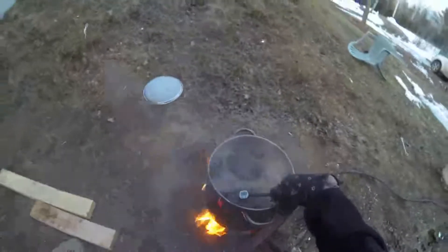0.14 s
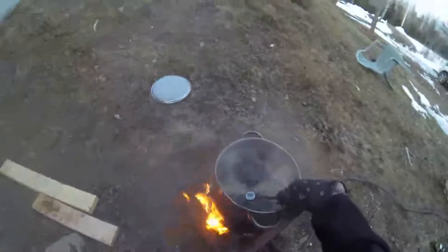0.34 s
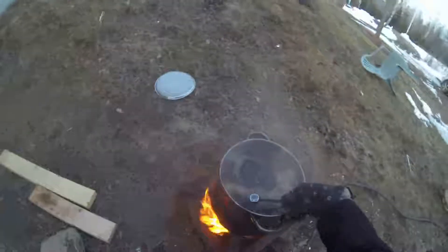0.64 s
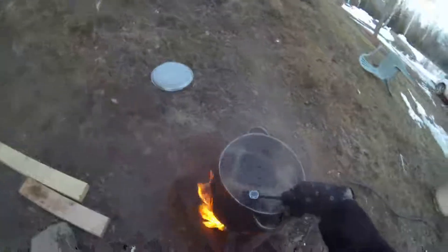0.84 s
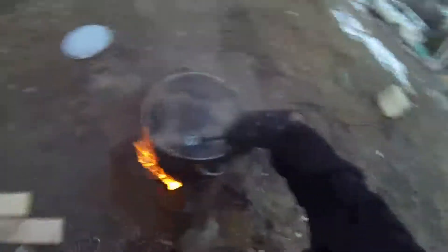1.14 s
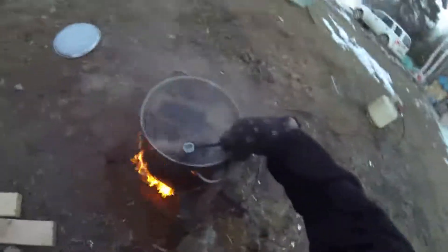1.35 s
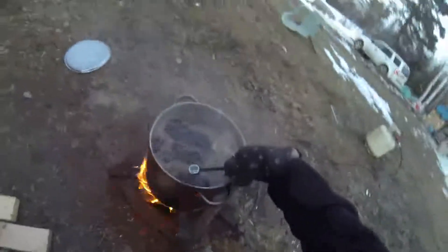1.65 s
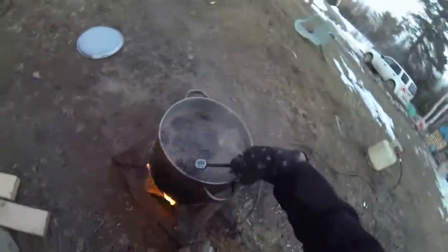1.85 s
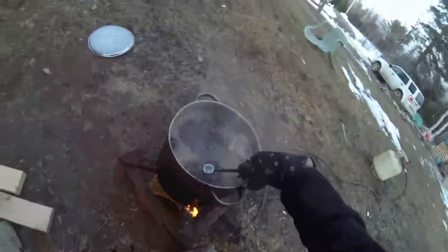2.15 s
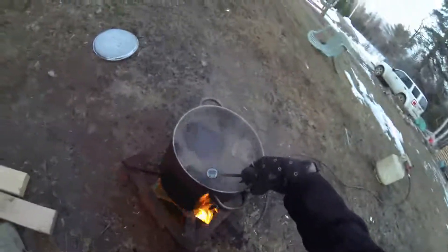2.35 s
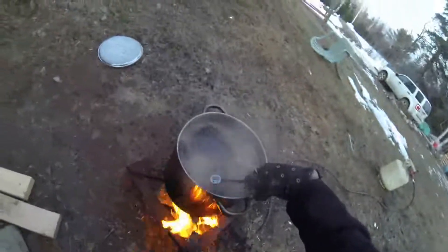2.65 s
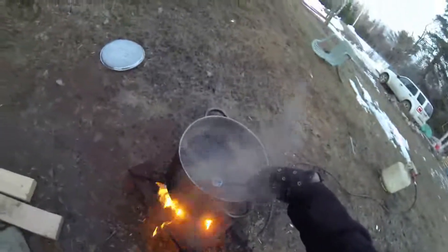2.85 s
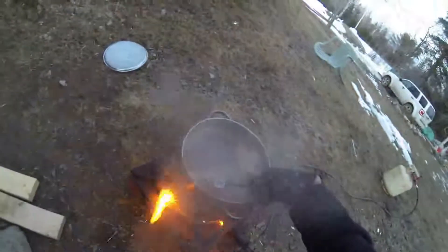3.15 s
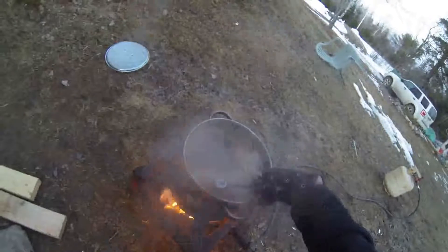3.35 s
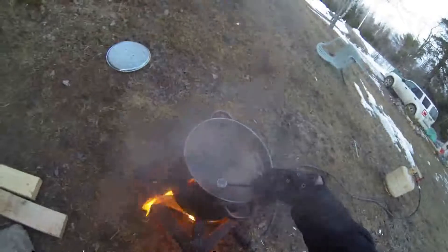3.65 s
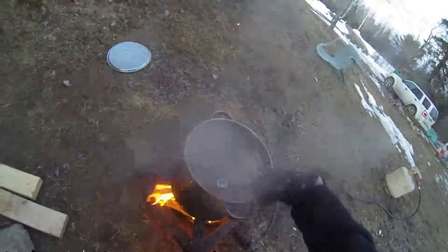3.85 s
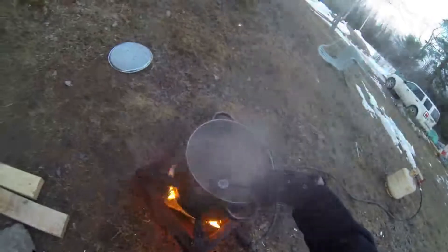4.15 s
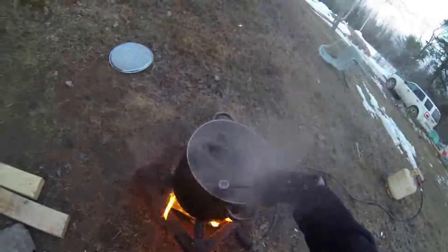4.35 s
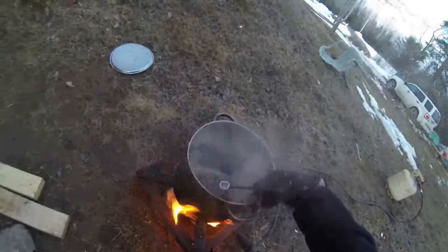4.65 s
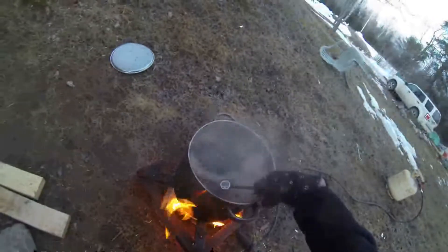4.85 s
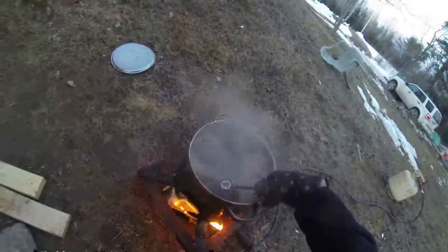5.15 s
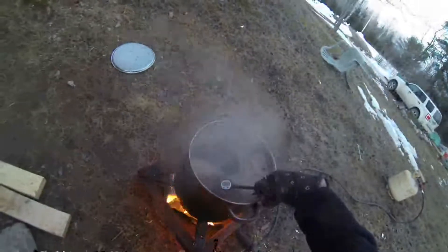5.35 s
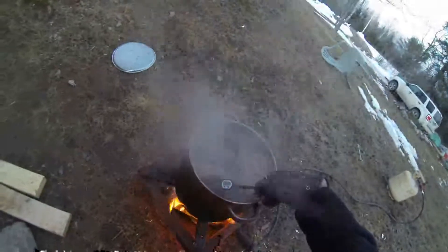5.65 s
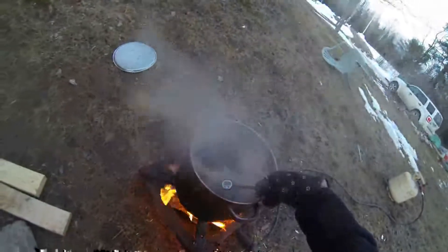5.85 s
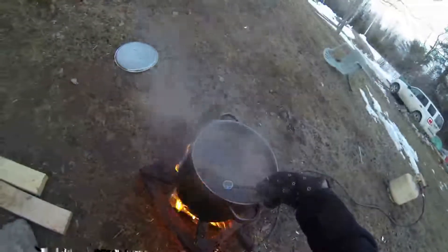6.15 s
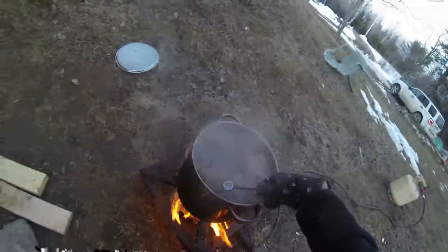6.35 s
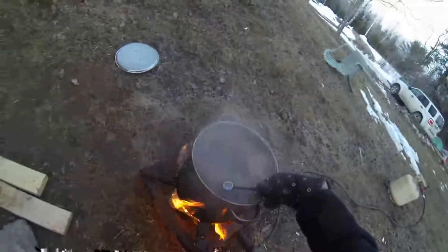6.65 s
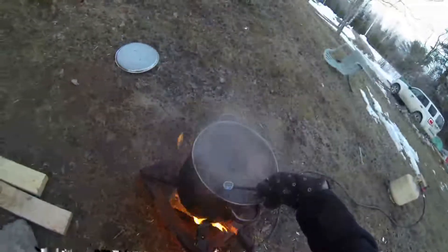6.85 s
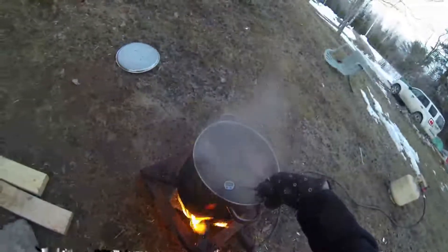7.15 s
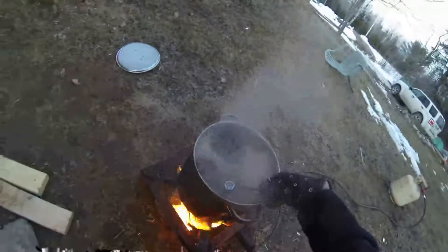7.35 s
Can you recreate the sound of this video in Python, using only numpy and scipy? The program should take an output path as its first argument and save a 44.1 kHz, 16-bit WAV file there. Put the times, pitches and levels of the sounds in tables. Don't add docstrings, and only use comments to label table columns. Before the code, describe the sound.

A pot of thick liquid boils hard outdoors, close to a small enclosed microphone, dry and slightly muffled. Throughout, countless bubbles merge into a grainy mid-pitched seethe with soft froth and fine fizz, dotted with hollow plops and droplets. From 0.4 to 1.6 s short wet bursts spatter, densest near 1.2 s. Wind thumps at about 1.7 s; a bright, loud plop stands out at 2.2 s. From 2.6 to 3.3 s deep gusts buffet and softly overload the microphone, partly covering the boil. They ease by 3.5 s. Splashes return around 4.1 to 5.3 s while the seethe sits slightly lower; 5.4 to 6.1 s is sparser. At 6.4 s a heavy gulping burst slaps, then spatters crowd in up to 7.5 s. Beneath, flames drone low and wavering, damp wood hisses faintly, and tiny sap ticks are rare, the clearest near 7.3 s.

```python
import sys
import numpy as np
from scipy import signal
from scipy.fft import rfft, irfft, next_fast_len
from scipy.io import wavfile
from scipy.ndimage import uniform_filter1d

SR = 44100
rng = np.random.default_rng(int(sys.argv[2]) if len(sys.argv) > 2 else 0)


def int16_out(signal):
    q = np.round(np.clip(np.atleast_2d(signal).T, -1, 1) * 32767)
    wavfile.write(sys.argv[1], SR, q.astype(np.int16))


def volts_from_decibels(level):
    exponent = np.asarray(level, float) / 20
    return 10 ** exponent


N = 330309

# start in seconds, then levels in dB of seething, froth,
# damp-wood hiss and thin steam jet.
BOIL = [(0.0, -53, -61, -80, -85), (0.1, -54.5, -61.5, -81, -87), (0.42, -56, -63, -79, -85),
        (0.79, -55, -62, -76, -89), (1.0, -54, -61.5, -76, -83), (1.11, -53, -60.5, -72, -90),
        (1.19, -52.5, -61, -75, -86), (1.38, -52, -60.5, -75, -89), (1.63, -52, -60, -77.5, -89),
        (2.0, -54, -62, -76.5, -86), (2.52, -53.5, -60, -79, -90), (2.61, -54, -62, -77, -92),
        (2.88, -52, -61.5, -80, -87), (3.17, -53.5, -62.5, -82, -95), (3.19, -53, -64.5, -80, -89),
        (3.44, -53, -62.5, -78, -90), (3.52, -50, -62.5, -84, -81), (3.63, -54, -61, -79, -88),
        (3.92, -57, -65, -82, -91), (4.23, -55.5, -63, -84, -91), (4.34, -56, -66.5, -78, -86),
        (4.57, -54, -65, -84, -92), (4.8, -55.5, -63.5, -81, -88), (4.84, -55, -63, -77, -92),
        (5.21, -57.5, -65.5, -80, -90), (5.42, -57.5, -65, -78, -88), (5.57, -56, -66.5, -82, -91),
        (6.13, -56, -65, -81, -93), (7.15, -56, -64.5, -79, -90), (7.43, -55, -60, -73, -87),
        (7.49, -52, -60, -82, -90)]
# frequency in Hz, density in dB per Hz.
SEETHE_SPECTRUM = [(76, -19), (130, -3.5), (309, -4), (422, -9), (615, -4), (800, -4.5), (930, -1),
                   (1240, -11.5), (1920, -5.5), (2150, -31), (2600, -30), (3380, -56), (5720, -120)]
# frequency in Hz, density in dB per Hz.
FROTH_SPECTRUM = [(1180, -28), (2000, -2.5), (2130, 0.5), (2400, -2), (2720, -2.5), (2970, 1), (3670, -8),
                  (4490, -9.5), (5180, -6), (5800, -20.5), (6500, -22), (8450, -47), (14300, -120)]
# frequency in Hz, density in dB per Hz.
FIZZ_SPECTRUM = [(2940, -3), (5000, -6), (5280, -2), (5930, -4), (7230, -4), (8450, -4), (9490, -10),
                 (10500, -6), (11700, -11.5), (13200, -18.5), (14200, -7), (15000, -12)]


def evened(x):
    return x / np.sqrt(np.mean(x ** 2) + 1e-20)


def column(rows, index):
    table = np.array(rows)
    return np.interp(np.arange(N) / SR, table[:, 0], table[:, index])


def coloured(x, spectrum):
    size = next_fast_len(len(x))
    f, db = np.transpose(spectrum)
    hz = np.fft.rfftfreq(size, 1 / SR)
    gain = volts_from_decibels(np.interp(np.log(hz + 1), np.log(f + 1), db))
    return evened(irfft(rfft(x, size) * gain, size)[:len(x)])


def resonate(x, hz, width_hz):
    turn = np.exp(2j * np.pi * hz * np.arange(len(x)) / SR)
    r = np.exp(-np.pi * width_hz / SR)
    return 2 * (turn * signal.lfilter([1 - r], [1, -r], x / turn)).real


def steadied(x, window_s):
    power = uniform_filter1d(x ** 2, max(round(window_s * SR), 1)).clip(1e-9)
    return evened(x / np.sqrt(power + 0.036))


def patchy(patchy_db, patch_hz, patch_s):
    frames = N // 64 + 5
    a, b, patches = rng.standard_normal((frames, 129, 3)).T
    patches = uniform_filter1d(patches, max(round(patch_hz * 256 / SR), 1), 0)
    patches = evened(uniform_filter1d(patches, max(round(patch_s * SR / 64), 1), 1))
    bins = (a + 1j * b) * volts_from_decibels(patchy_db * patches)
    return signal.istft(bins, nperseg=256, noverlap=192)[1][:N]


def add(mix, s, sound):
    part = mix[round(s * SR):][:len(sound)]
    part += sound[:len(part)]


def ticks(per_s, spread_db):
    size = volts_from_decibels(spread_db * np.minimum(rng.exponential(1, N), 3)) * rng.choice([-1, 1], N)
    return evened(size * (rng.random(N) < per_s / SR))


def seething():
    t = np.arange(4000) / SR
    spit = volts_from_decibels(-60 * t / 0.07) * (1 - np.exp(-t / 0.001))
    kick = signal.oaconvolve(abs(ticks(60, 3.0)), spit)[:N]
    grain = evened(patchy(1.5, 500, 0.012)) + 0.9 * ticks(450, 3.5)
    body = evened(coloured(grain, SEETHE_SPECTRUM) * (1 + 0.025 * kick))
    froth = evened(coloured(patchy(1.3, 900, 0.022), FROTH_SPECTRUM) * (1 + 0.011 * kick))
    fizz = evened(coloured(patchy(1.2, 2500, 0.021), FIZZ_SPECTRUM) * (1 + 0.0067 * kick))
    return body * volts_from_decibels(column(BOIL, 1) - 2.0) + froth * volts_from_decibels(column(BOIL, 2)) + fizz * volts_from_decibels(-72.5)


def plop(hz, cycles, glide, rise=0.78):
    turns = np.arange(round(4 * cycles * SR / hz)) * hz / SR
    shape = (1 - np.exp(-(turns / rise) ** 2)) * np.exp(-2.2 * turns / cycles)
    return -np.sin(2 * np.pi * turns * (1 + glide * turns)) * shape / shape.max()


def swarm(per_s, low_hz, high_hz, loudest_hz, cycles, slope_db):
    out, kinds = np.zeros(N), np.geomspace(low_hz, high_hz, 16)
    size = volts_from_decibels(4.9 * np.minimum(rng.exponential(1, N), 3)) * (rng.random(N) < per_s / SR)
    kind = rng.integers(0, len(kinds), N)
    for k, hz in enumerate(kinds):
        octaves_off = abs(np.log2(hz / loudest_hz))
        ring = plop(hz, cycles, 0.0101) * volts_from_decibels(-slope_db * octaves_off)
        out += signal.oaconvolve(size * (kind == k), ring)[:N]
    return evened(out) * volts_from_decibels(column(BOIL, 1) + 53.5)


def bubbles():
    # start in seconds, peak in dB, pitch in Hz, cycles until faded.
    plops = [(0.089, -42, 950, 2.7), (0.194, -29.5, 860, 1.5), (0.255, -38, 985, 3.0),
             (0.451, -38, 1610, 3.0), (0.509, -45, 972, 3.0), (0.946, -41, 826, 3.3),
             (1.143, -35, 1000, 3.0), (1.375, -38.5, 930, 4.1), (1.956, -40.5, 910, 4.1),
             (2.036, -36.5, 704, 3.8), (2.196, -29.5, 610, 3.0), (2.219, -19, 1030, 3.8),
             (2.269, -36, 867, 2.7), (2.283, -37.5, 460, 3.3), (2.385, -34, 925, 3.0),
             (2.459, -36.5, 570, 2.2), (2.622, -44, 395, 3.0), (2.719, -49, 600, 3.0),
             (2.805, -36, 865, 3.0), (3.12, -35.5, 610, 4.7), (3.478, -41, 1750, 3.0),
             (3.499, -51, 795, 3.0), (3.546, -35.5, 960, 2.6), (3.689, -42, 781, 4),
             (3.71, -33.5, 888, 3.8), (3.822, -44, 620, 2.5), (3.864, -37, 1070, 3.0),
             (3.892, -35.5, 980, 4.2), (4.248, -41, 503, 2.4), (4.756, -43, 966, 3.0),
             (5.426, -35.5, 904, 7.6), (5.565, -39.5, 925, 3.0), (5.594, -40, 1000, 3.6),
             (5.907, -39.5, 1040, 3.3), (6.149, -41, 990, 3.5), (6.194, -35.5, 970, 3.6),
             (6.94, -31.5, 600, 1.4), (7.189, -38.5, 550, 4.1)]
    # start in seconds, peak in dB, pitch in Hz,
    # cycles until faded.
    gulps = [(0.661, -44, 280, 4.3), (1.204, -54, 280, 1.6), (1.41, -37.5, 196, 1.9),
             (2.345, -42, 290, 1.8), (2.418, -44, 121, 1.8), (2.614, -30.5, 119, 1.6),
             (2.766, -35.5, 161, 2.8), (2.925, -49, 213, 1.6), (3.319, -39, 149, 1.4),
             (4.36, -45, 272, 0.98), (4.41, -34, 262, 0.77), (4.642, -44.5, 161, 1.9),
             (4.851, -39, 300, 3.9), (5.073, -41, 342, 1.6), (5.275, -38.5, 224, 3.3),
             (6.367, -26, 223, 1.5), (6.486, -39, 300, 2.2), (7.009, -44, 196, 1.9), (7.406, -38, 323, 1.6),
             (7.44, -33.5, 230, 1.8)]
    # start in seconds, peak in dB, pitch in Hz, cycles until faded.
    cracks = [
        (0.6529, -62, 6650, 9.0),
        (2.9557, -61, 7740, 9.0),
        (3.6566, -61, 8300, 9.0),
        (5.7468, -59, 8370, 9.0),
        (6.3694, -59, 6640, 9.9),
        (7.2863, -53, 8500, 9.0),
    ]
    out = volts_from_decibels(-61) * swarm(260, 261.3, 2094, 870, 4.7, 2.0)
    out += volts_from_decibels(-67.5) * swarm(280, 1486, 9400, 1540, 12.0, 5.2)
    for s, db, hz, cycles in plops:
        add(out, s + 0.00058, volts_from_decibels(db - 2.5) * plop(hz, max(cycles, 0.7), 0.004))
        add(out, s + 0.00051, volts_from_decibels(db - 13.5) * plop(1.49 * hz, 4.7, 0.013))
    for s, db, hz, cycles in gulps:
        add(out, s + 0.00052, volts_from_decibels(db - 3.5) * plop(hz, max(cycles, 0.7), 0.004, rise=0.8))
    for s, db, hz, cycles in cracks:
        add(out, s, volts_from_decibels(db + 2.5) * plop(hz, cycles, 0.001))
    return out


def splashes():
    # start in seconds, gush level in dB, slap level in dB, spray level in dB, t60 in seconds.
    bursts = [(0.39, -41.5, -64, -57, 0.15), (0.459, -49, -62, -70, 0.045), (0.667, -53, -65, -56, 0.1),
              (0.834, -49, -65, -52.5, 0.094), (1.018, -39.5, -60, -54, 0.098),
              (1.058, -43, -50, -54, 0.16), (1.208, -34, -53, -56, 0.12), (1.257, -37, -44, -54, 0.11),
              (1.413, -42.5, -54, -61, 0.18), (1.445, -53, -53, -62, 0.14), (1.564, -40.5, -52, -63, 0.099),
              (2.054, -38, -61, -62, 0.092), (2.116, -38, -60, -69, 0.044), (2.172, -51, -48, -63, 0.1),
              (2.421, -46, -42.5, -56, 0.17), (2.503, -34.5, -48, -50, 0.075),
              (2.544, -39, -58, -53, 0.057), (2.726, -39, -51, -76, 0.14), (2.783, -47, -58, -56, 0.13),
              (2.917, -43.5, -49, -53, 0.2), (3.637, -47, -54, -63, 0.12), (3.796, -47.5, -60, -59.5, 0.29),
              (3.97, -50, -67, -69, 0.054), (4.056, -37, -65, -61, 0.15), (4.165, -32.5, -64, -53, 0.082),
              (4.191, -54, -65, -50, 0.069), (4.277, -38.5, -52, -55, 0.13), (4.315, -43, -50, -59, 0.11),
              (4.361, -64, -46, -59.5, 0.32), (4.491, -48, -65, -60, 0.091), (4.524, -41.5, -70, -56, 0.19),
              (4.634, -48, -49, -57, 0.26), (4.685, -40, -64, -60, 0.067), (4.832, -33, -48, -50, 0.072),
              (5.034, -47, -64, -69, 0.16), (5.076, -38, -42.5, -54.5, 0.19), (5.28, -37.5, -52, -57, 0.11),
              (5.737, -45.5, -48, -64, 0.23), (6.162, -39.5, -67, -60, 0.11),
              (6.369, -35.5, -35.5, -53.5, 0.15), (6.418, -43, -45, -53.5, 0.077),
              (6.458, -45.5, -61, -65, 0.11), (6.49, -40.5, -44.5, -53, 0.19),
              (6.541, -33.5, -62, -62, 0.07), (6.745, -40, -75, -61.5, 0.15),
              (6.828, -43.5, -45, -54.5, 0.13), (6.953, -46, -46, -57, 0.099),
              (7.014, -43.5, -45.5, -52, 0.15), (7.164, -47, -44.5, -56.5, 0.18),
              (7.298, -37.5, -44, -50, 0.08), (7.356, -35, -51, -49.5, 0.069),
              (7.41, -34, -36, -51.5, 0.13)]
    slap_spectrum = [(90, -28), (170, -8), (300, 8.5), (450, -8.5), (900, -42), (3000, -120)]
    t = np.arange(9000) / SR
    gush_env, slap_env, spray_env = np.zeros((3, N))
    for s, gush_db, slap_db, spray_db, t60_s in bursts:
        fade = (1 - np.exp(-t / 0.00099)) * volts_from_decibels(-60 * t / max(t60_s, 0.02))
        add(gush_env, s, volts_from_decibels(gush_db - 6.5) * fade)
        add(slap_env, s, volts_from_decibels(slap_db - 3.0) * fade)
        add(spray_env, s, volts_from_decibels(spray_db + 0.5) * fade)
    grain = evened(patchy(1.1, 500, 0.006)) + 1.56 * ticks(700, 2.3)
    gush = steadied(coloured(grain, SEETHE_SPECTRUM), 0.0067)
    slap = steadied(coloured(rng.standard_normal(N), slap_spectrum), 0.0043)
    spray = coloured(patchy(2.2, 900, 0.005), FROTH_SPECTRUM)
    spray = spray + 0.12 * coloured(rng.standard_normal(N), FIZZ_SPECTRUM)
    return gush_env * gush + slap_env * slap + spray_env * spray


def fire():
    # time in seconds, level in dB.
    flame = [
        (0, -64),
        (1.2, -58.5),
        (2.5, -63),
        (4.5, -57),
        (4.9, -67),
        (6.4, -68),
        (6.8, -59),
        (7.49, -54.5),
    ]
    drone_hz, waver_hz, waver_db = 91, 1.8, 2.35
    waver = uniform_filter1d(rng.standard_normal((2, N)), 2500)
    waver = evened(uniform_filter1d(waver, 2500))
    phase = 2 * np.pi * np.cumsum(drone_hz + waver_hz * waver[0]) / SR
    drone = evened(np.sin(phase) * volts_from_decibels(waver_db * waver[1])) * volts_from_decibels(column(flame, 1))
    hiss = patchy(1.5, 900, 0.01)
    wood = evened(resonate(resonate(hiss, 8500, 900), 8500, 900)) * volts_from_decibels(column(BOIL, 3) - 2.0)
    jet = evened(resonate(resonate(hiss, 13000, 1000), 13000, 1000)) * volts_from_decibels(column(BOIL, 4) + 5.5)
    return drone + wood + jet


def wind():
    # start in seconds, rumble level in dB, buffeting level in dB.
    gusts = [(0.0, -59, -56), (0.06, -47, -67), (0.23, -46.5, -65), (0.35, -58, -63), (0.42, -48.5, -71),
             (0.48, -64, -73), (0.5, -47, -64), (0.69, -56.5, -63), (0.77, -48, -61), (0.87, -59, -70),
             (0.94, -48.5, -76), (1.13, -44, -71), (1.23, -50.5, -60.5), (1.61, -49, -53),
             (1.69, -37.5, -66), (1.75, -31, -61), (1.81, -30.5, -59), (1.85, -42.5, -58),
             (1.92, -47.5, -58), (1.98, -40, -59), (2.21, -52, -66), (2.23, -38, -66), (2.25, -39, -63),
             (2.31, -47, -58), (2.33, -42, -57), (2.52, -42.5, -54), (2.61, -26.5, -57.5), (2.65, -20, -61),
             (2.71, -37, -56), (2.77, -24.5, -58), (2.9, -37, -73), (2.94, -26.5, -56), (3.02, -47, -62),
             (3.06, -25, -65), (3.13, -33, -62), (3.17, -28.5, -58), (3.23, -38, -59), (3.32, -32, -56),
             (3.4, -44.5, -58), (3.44, -43, -62), (3.5, -51, -63), (3.67, -44.5, -62), (3.73, -62, -60),
             (3.8, -44, -59), (3.84, -57, -60), (3.88, -43.5, -64), (4.01, -56, -58.5), (4.23, -41.5, -69),
             (4.42, -51, -57), (4.49, -60, -68), (4.53, -48.5, -68), (4.63, -55, -64), (4.8, -53.5, -67),
             (4.88, -45.5, -58), (4.94, -53.5, -61), (5.19, -49, -54.5), (5.21, -64, -62),
             (5.25, -47.5, -57.5), (5.42, -58, -59), (5.51, -44, -59.5), (5.57, -63, -63), (5.61, -48, -56),
             (5.65, -55, -62), (5.8, -36, -56), (5.88, -39.5, -65), (5.94, -50.5, -64), (6.01, -43, -59),
             (6.09, -61, -63), (6.15, -48, -61), (6.22, -50, -63), (6.3, -35.5, -63), (6.47, -53.5, -55),
             (6.51, -39.5, -59), (6.55, -64, -52), (6.61, -42, -64), (6.65, -59, -63), (6.7, -40, -61),
             (6.82, -56, -67), (6.86, -42, -59), (6.92, -54, -67), (7.15, -49.5, -76), (7.28, -52, -66),
             (7.32, -36, -48), (7.34, -38, -56), (7.41, -50, -62), (7.49, -51, -64)]
    # frequency in Hz, density in dB per Hz.
    rumble_spectrum = [(5, -31), (10, -8), (21, -4), (32, -1), (45, -5.5), (70, -17.5), (110, -29),
                       (140, -57), (240, -120)]
    # frequency in Hz, density in dB per Hz.
    buffet_spectrum = [(45, -53), (90, -3), (135, 0), (200, -7), (320, -11), (600, -53), (2000, -120)]
    # start in seconds, peak in dB, pitch in Hz.
    puff = (1.7555, -25, 115)
    rumble_db = column(gusts, 1)
    rumble = steadied(coloured(rng.standard_normal(N), rumble_spectrum), 0.09) * volts_from_decibels(rumble_db)
    buffet_db = column(gusts, 2) + np.maximum(rumble_db + 36, 0)
    buffet = steadied(coloured(rng.standard_normal(N), buffet_spectrum), 0.036) * volts_from_decibels(buffet_db)
    puff_s, puff_db, puff_hz = puff
    add(buffet, puff_s, -volts_from_decibels(puff_db) * plop(puff_hz, 1.0, -0.086, rise=0.26))
    return rumble + buffet


def scene():
    return (seething() + bubbles() + splashes() + fire() + wind())[None]


def top_cut(x):
    return signal.sosfilt(signal.butter(12, 15190, fs=SR, output="sos"), x)


def record(dry):
    limit = 0.16
    mix = limit * np.tanh(dry / limit)
    return top_cut(mix)


dry = scene()
out = record(dry)
int16_out(out)
```